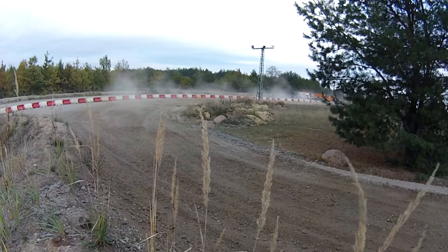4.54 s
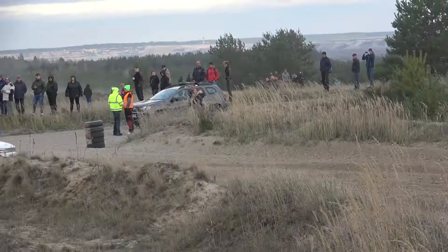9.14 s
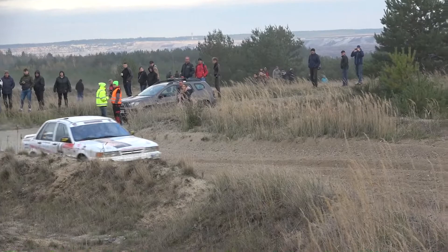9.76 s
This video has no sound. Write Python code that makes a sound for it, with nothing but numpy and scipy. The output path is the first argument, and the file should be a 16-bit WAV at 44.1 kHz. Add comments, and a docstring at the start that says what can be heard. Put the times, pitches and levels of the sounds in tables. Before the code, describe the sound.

A turbocharged rally car slides through a gravel bend, passes close with rasping exhaust and clicking stones, then pulls away.

```python
"""Rally car on a gravel bend

A turbocharged four-cylinder car slides through the bend, passes close by and pulls away. Its exhaust
pulses drone and rasp with the throttle, tyres tear at the gravel and stones click. Behind it are a
second, far engine and a faint high whine. Near the end the scene cuts to a car booming in the open."""
import sys
import numpy as np
from scipy import signal
from scipy.fft import rfft, irfft
from scipy.io import wavfile
from scipy.ndimage import uniform_filter1d

SR = 44100
rng = np.random.default_rng(int(sys.argv[2]) if len(sys.argv) > 2 else 0)


def pcm_store(signal):
    """Save signal as 16-bit PCM."""
    levels = np.round(np.clip(np.atleast_2d(signal), -1, 1) * 32767)
    wavfile.write(sys.argv[1], SR, levels.astype(np.int16).T)


N = 437472
T = np.arange(N) / SR


def amp(db):
    """Decibels to gain."""
    return 10 ** (np.asarray(db) / 20)


def unit(x):
    """Scale to rms 1."""
    return x / np.sqrt(np.mean(x ** 2) + 1e-20)


def curves(rows):
    """Table columns interpolated over the times in the first."""
    times_s, *columns = np.transpose(rows)
    return [np.interp(T, times_s, column) for column in columns]


def held(start_s, end_s, attack_s, release_s):
    """Envelope 0-1: rises from start_s, falls from end_s."""
    return np.clip(np.minimum((T - start_s) / attack_s, 1 - (T - end_s) / release_s), 0, 1)


def bell(centre_s, width_s):
    """Gaussian swell, 0-1."""
    return np.exp(-((T - centre_s) / width_s) ** 2)


def add(mix, start_s, sound):
    """Mix a sound in at start_s."""
    part = mix[round(start_s * SR):][:len(sound)]
    part += sound[:len(part)]


def colour(x, spectrum):
    """Filter by (Hz, dB) points, falling 30 dB per octave beyond the ends; rms 1."""
    hz, db = np.transpose(spectrum)
    bin_oct, point_oct = np.log2(np.fft.rfftfreq(N, 1 / SR) + 1), np.log2(hz)
    outside_oct = np.maximum(point_oct[0] - bin_oct, 0) + np.maximum(bin_oct - point_oct[-1], 0)
    return unit(irfft(rfft(x) * amp(np.interp(bin_oct, point_oct, db) - 30 * outside_oct), N))


def noise(spectrum):
    """Coloured noise, rms 1."""
    return colour(rng.standard_normal(N), spectrum)


def wander(rate_hz):
    """Smooth random curve up to about rate_hz, rms 1."""
    bin_hz = np.fft.rfftfreq(N, 1 / SR)
    return unit(irfft(rfft(rng.standard_normal(N)) / (1 + (bin_hz / rate_hz) ** 4), N))


def resonate(x, hz, width_hz, widen=1):
    """Two unity-gain resonators in series, the second widen times as wide."""
    for stage_hz in (width_hz, widen * width_hz):
        radius = np.exp(-np.pi * stage_hz / SR)
        x = 2 * signal.lfilter([1 - radius], [1, -radius * np.exp(2j * np.pi * hz / SR)], x).real
    return x


def patchy(x, depth_db, bins=9, frames=16):
    """Patches of the spectrum swell and fade, as on uneven ground; rms 1."""
    spectra = signal.stft(x, nperseg=1024, noverlap=768)[2]
    field = uniform_filter1d(uniform_filter1d(rng.standard_normal(spectra.shape), bins, 0), frames, 1)
    return unit(signal.istft(spectra * amp(depth_db * unit(field)), nperseg=1024, noverlap=768)[1][:N])


def whine(hz=10519, level_db=-67.5):
    """A faint, steady high tone."""
    return np.sqrt(2) * amp(level_db) * np.sin(2 * np.pi * hz * T)


def far_car(overtone_db=-19):
    """A second engine: distance leaves little but the firing tone."""
    # Each row: time in seconds, firing rate in Hz, level in dB.
    revs = [(7.7, 150, -50), (8.0, 155, -32.5), (8.36, 165.3, -30), (8.55, 156, -37.5), (9.2, 155, -35)]
    hz, db = curves(revs)
    phase = 2 * np.pi * np.cumsum(hz * (1 + 0.00687 * wander(12))) / SR
    tone = np.sin(phase) + amp(overtone_db) * (np.sin(2 * phase) + np.sin(3 * phase))
    return np.sqrt(2) * amp(db + 2.7 * wander(3.2)) * tone


def booming_car(boom_hz=141.7, sag_hz_per_s=11, edge_s=0.039, burble=0.18, pan_db=2):
    """Two pulls of burbling exhaust, leaning left, with a falling hum, tyre roar and wide hiss."""
    # Each row: start and end in seconds, then relative dB of firing tone, octave, roar and hiss.
    pulls = [(9.2, 9.607, -14.5, -42.5, -35.5, -51), (9.66, 9.93, -20, -30.5, -35.5, -46)]
    # Spectra. Each row: frequency in Hz, relative density in dB.
    rumble_spectrum = [(15, -28), (45, -15), (80, -3.5), (150, -1.5), (200, -6), (260, -13), (450, -22),
                       (800, -34.5)]
    roar_spectrum = [(260, -31), (450, -6.5), (604, -7), (713, -1), (1320, -8.5), (1490, -14),
                     (1990, -15.5), (2520, -37), (3000, -20.5), (3900, -64), (6600, -120)]
    hiss_spectrum = [(1470, -51), (2500, -2.5), (2880, -12), (3110, -4.5), (3950, -1.5), (4690, -10),
                     (5170, -9), (7410, -11), (15000, -33)]
    start_s, _, tone_db, octave_db, roar_db, hiss_db = curves([(s, *p) for p in pulls for s in p[:2]])
    pulling = np.max([held(begin_s, end_s, edge_s, edge_s) for begin_s, end_s, *_ in pulls], 0)
    phase = 2 * np.pi * np.cumsum(boom_hz - sag_hz_per_s * (T - start_s)) / SR
    odd_orders = np.sin(phase) + amp(-30) * (np.sin(3 * phase) + np.sin(5 * phase))
    tones = pulling * amp(tone_db) * odd_orders + amp(octave_db) * np.sin(2 * phase)
    boom = np.sqrt(2) * tones * (1 + burble * wander(45))
    hum_hz = np.interp(T, [9.2, 9.9], [416, 392])
    hum = amp(-35) * np.sin(2 * np.pi * np.cumsum(hum_hz) / SR)
    rumble = amp(-26 + 6 * bell(centre_s=9.5, width_s=0.06)) * noise(rumble_spectrum)
    side = np.array([[1], [-1]])  # left, right
    roar = patchy(noise(roar_spectrum), depth_db=1.4) + 0.086 * side * noise(roar_spectrum)
    hiss = noise(hiss_spectrum) + 0.35 * side * noise(hiss_spectrum)
    return (boom + hum + rumble) * amp(pan_db * side) + amp(roar_db) * roar + amp(hiss_db - 2) * hiss


def turbo(base_db=-68, db_per_hz=-0.03, fade_s=0.07, waver=0.0037, flicker_db=4):
    """The compressor's thin, unsteady whistle, fainter as its pitch rises."""
    # Each row: time in seconds, pitch in Hz.
    pitch = [(1.6, 8200), (2.15, 8050), (2.41, 8900), (2.72, 7750)]
    hz, = curves(pitch)
    start_s, start_hz = pitch[0]
    spinning = held(start_s, pitch[-1][0] - fade_s, fade_s, fade_s)
    level_db = base_db + db_per_hz * (hz - start_hz) + flicker_db * wander(22)
    phase = 2 * np.pi * np.cumsum(hz * (1 + waver * wander(80))) / SR
    return spinning * amp(level_db) * np.sin(phase)


def tyre_levels(nearness, load, coasting_db=-11):
    """Roar, grit and rumble in relative dB: rolling, which falls with distance, plus slides."""
    # Tyres break loose. Each row: start and end in seconds, then relative dB of roar, grit and rumble.
    slides = [(0.246, 1.018, -42.5, -64, -41), (0.88, 2.25, -40.5, -69, -37), (2.118, 3.705, -32, -57, -33),
              (2.786, 3.377, -31.5, -48, -27), (3.223, 3.673, -40, -45, -50),
              (4.36, 5.588, -34, -48.5, -31), (4.677, 5.09, -39, -46, -32), (5.05, 5.986, -70, -57.5, -34),
              (7.496, 8.92, -46.5, -68, -38)]
    roar = amp(-39.5) * nearness ** 0.99
    spray = amp(-50.5 + coasting_db * (1 - load)) * nearness ** 1.4  # undriven wheels throw less
    rumble = amp(-38.5) * nearness ** 0.9
    power = np.array([roar, spray, rumble]) ** 2
    for start_s, end_s, *levels_db in slides:
        power += np.outer(amp(levels_db), held(start_s, end_s, attack_s=0.29, release_s=0.11)) ** 2
    return 10 * np.log10(power)


def ground_rumble(level_db):
    """Low noise of tyres on the ground."""
    # Each row: frequency in Hz, relative density in dB.
    spectrum = [(15, -26), (35, -13), (70, -4), (110, -1.5), (200, -0.5), (330, -6.5), (480, -15),
                (900, -27)]
    return amp(level_db) * noise(spectrum)


def gravel_roar(level_db, cycles, pulsing, turn_start_s=3.32, turn_s=0.67):
    """Churned gravel and pulsing exhaust gas, changing colour as the car goes by."""
    # Spectra. Each row: frequency in Hz, relative density in dB.
    coming = [(300, -6), (450, -1.5), (650, -0.5), (850, 2), (1290, -2), (1600, -6), (2200, -8.5),
              (3500, -12.5), (4600, -28), (6000, -25.5)]
    going = [(300, -9), (500, -2), (700, 0), (980, -2.5), (1300, -1.5), (2000, -5), (2600, -9.5),
             (3000, -11.5), (4100, -24), (6000, -25)]
    passed = np.clip((T - turn_start_s) / turn_s, 0, 1)
    rush = patchy(np.sqrt(1 - passed) * noise(coming) + np.sqrt(passed) * noise(going), depth_db=1.33)
    throb = np.sqrt(1 - pulsing + pulsing * gas_puffs(cycles, decay_cycles=0.92) ** 2)
    return amp(level_db + wander(32)) * rush * throb


def grainy_swells(grain=0.41):
    """Grainy swells of band noise: gravel crunches and the tail of the exhaust rasp."""
    # Each row: midpoint in seconds, length in seconds, centre in Hz, width in Hz, level in dB.
    swells = [(1.483, 0.048, 2240, 1500, -36.5), (1.57, 0.07, 2040, 1500, -37),
              (3.441, 0.045, 1780, 2500, -28.5), (3.793, .2, 1050, 447, -35),
              (4.573, 0.25, 1860, 899, -35.5), (4.827, .16, 1430, 600, -36), (4.884, 0.11, 5310, 1200, -38),
              (6.653, 0.05, 4500, 3000, -40.5), (6.984, .022, 1520, 1400, -33),
              (7.187, 1.6, 5050, 1850, -51), (7.324, 0.87, 1610, 990, -43), (8.203, 1.0, 634, 379, -42.5),
              (8.323, 0.39, 3904, 1200, -50)]
    out = np.zeros(N)
    grainy = rng.standard_normal(N) * np.exp(grain * wander(200))
    for mid_s, length_s, hz, width_hz, db in swells:
        swell = np.hanning(round(length_s * SR))
        part = grainy[round(mid_s * SR):][:len(swell)]
        add(out, mid_s - length_s / 2, amp(db) * swell * unit(resonate(part, hz, width_hz)))
    return out


def crackle(hits_per_s=1500, spread_db=3, ring_s=0.0015, pitches=24):
    """Countless small stones, each a brief noisy ring; a few are large."""
    t, out = np.arange(512) / SR, np.zeros(N)
    for hz in np.linspace(3000, 14500, pitches):
        size = amp(spread_db * np.minimum(rng.exponential(1, N), 5))
        hits = size * rng.choice([-1, 1], N) * (rng.random(N) < hits_per_s / pitches / SR)
        ring = np.exp(-t / ring_s) * (np.sin(2 * np.pi * hz * t) + 0.72 * rng.standard_normal(len(t)))
        out += signal.oaconvolve(hits, ring)[:N]
    return unit(out)


def grit(level_db, gain_db=2, dust=0.93, clump_db=2):
    """Spray of grit and dust; the nearer and louder, the more treble it keeps."""
    # Spectra. Each row: frequency in Hz, relative gain in dB.
    far_spectrum = [(2500, 0.5), (4000, 0), (5000, -2.5), (6500, -5.5), (7600, -11.5), (10000, -9.5),
                    (12500, -16), (15500, -23)]
    near_spectrum = [(2500, -4), (4000, -3), (5300, -3), (6500, -6.5), (7800, -13), (10500, -9),
                     (13000, -12), (15500, -25)]
    spray = (crackle() + dust * rng.standard_normal(N)) * amp(clump_db * wander(16))
    near = np.clip((level_db + 54) / 9, 0, 1)
    blend = near * colour(spray, near_spectrum) + (1 - near) * colour(spray, far_spectrum)
    return amp(level_db + gain_db) * blend


def stones(crack_s=0.002, ring_s=0.0073, scatter_s=0.073):
    """Stones strike car and ground: a hard crack, two ringing modes, a scatter of chips."""
    # Each row: start in seconds, relative level in dB, pitch of the stone's main ring in Hz.
    strikes = [(0.713, -29, 3180), (0.7513, -33, 3820), (0.82, -34, 3420), (1.124, -35, 2980),
               (1.1749, -35, 3120), (2.6275, -24, 3090), (2.8943, -25, 3530), (2.9708, -17.5, 3220),
               (3.048, -16, 3400), (3.124, -24.5, 3100), (3.3162, -19.5, 3360), (3.362, -19.5, 3540),
               (3.5205, -22, 3218), (4.8597, -19, 5300), (4.947, -22, 5250), (5.0491, -18.5, 3816),
               (5.073, -20.5, 5350), (5.2745, -29, 5130), (5.709, -26.5, 5590), (6.1142, -36, 3268),
               (6.412, -31, 9960), (6.4627, -33.5, 6190), (6.6445, -22.5, 3467), (6.7727, -29, 4600)]
    t, out = np.arange(4000) / SR, np.zeros(N)
    band = signal.butter(2, [1900, 7000], "band", fs=SR)
    envelope = np.exp(-t / crack_s) + 0.074 * np.exp(-t / scatter_s)
    for start_s, db, hz in strikes:
        crack = signal.lfilter(*band, rng.standard_normal(len(t))) * envelope
        modes = np.sin(2 * np.pi * hz * t) + 0.5 * np.sin(2 * np.pi * rng.uniform(4500, 7000) * t)
        add(out, start_s, amp(db - 1) * (crack + 0.32 * modes * np.exp(-t / ring_s)))
    return out


def gas_puffs(cycles, decay_cycles):
    """Envelope of the decaying puff of gas from each firing; rms 1."""
    return unit(np.exp(-((cycles + 0.05) % 1) / decay_cycles))


def pops(rise_s=0.011, fall_s=0.045):
    """Unburnt fuel goes off in the pipe: short, dull bursts."""
    # Each row: start in seconds, level in dB.
    bursts = [(.75, -43), (3.37, -20), (3.43, -24.5)]
    gas = unit(resonate(rng.standard_normal(N), hz=260, width_hz=550))
    return gas * sum(amp(db) * held(s, s + rise_s, rise_s, fall_s) for s, db in bursts)


def bark(cycles, level_db=-36.5):
    """Gas puffs in the pipe's lowest resonance, heard from straight behind."""
    gas = gas_puffs(cycles, decay_cycles=0.38) * rng.standard_normal(N)
    return amp(level_db) * unit(resonate(gas, hz=560.2, width_hz=360))


def rasp(cycles, level_db=-29):
    """Sharp, turbulent puffs ring the tailpipe as the throttle is floored close by."""
    # Each row: resonance in Hz, width in Hz, relative gain in dB.
    modes = [(944, 140, 3.5), (1220, 170, 6), (1520, 120, 2.5), (2050, 210, -2), (2310, 330, 0.5),
             (3160, 180, -3), (4030, 160, -13)]
    gas = gas_puffs(cycles, decay_cycles=0.27) * rng.standard_normal(N)
    pipe = unit(sum(amp(db) * resonate(gas, hz, width_hz, widen=4) for hz, width_hz, db in modes))
    return amp(level_db) * held(start_s=3.51, end_s=3.72, attack_s=0.059, release_s=0.033) * pipe


def drone(cycles, tone_db, octave_db, corner_hz, uneven, fall_db_per_oct=17, flutter_hz=45):
    """Exhaust pulses as aligned engine orders; uneven firing shakes their size and timing."""
    # Each row: multiple of the firing rate, relative level in dB.
    orders = [(.5, -31), (1, 2), (1.5, -22), (2, -1), (2.5, -18), (3, -10), (3.5, -21.5), (4, -19),
              (4.5, -25), (5, -19.5), (5.5, -42), (6, -31), (6.5, -28), (7, -26)]
    order_db = dict(orders)
    hz = np.gradient(cycles) * SR
    shaken = cycles + 0.07 * uneven * wander(flutter_hz)
    out = np.zeros(N)
    for order, db in orders:
        size = amp(tone_db + db if order < 2 else octave_db + db - order_db[2])
        if order > 2:
            size *= amp(-fall_db_per_oct * np.maximum(np.log2(order * hz / corner_hz), 0))
        if order % 1:  # half orders come from unequal cylinders
            size *= uneven / 0.11 * amp(2 * wander(13))
        drift_rad = 0.45 * max(order - 2.5, 0) * wander(14)  # echo off the ground shifts the high orders as the car moves
        out -= size * np.sin(2 * np.pi * order * shaken + drift_rad)
    return np.sqrt(2) * out * (1 + 0.45 * uneven * wander(flutter_hz))


def exhaust(cycles, hz, tone_db, flare_db, load, nearness, loaded_db=0.25, coasting_db=-22.5):
    """Load and pipe aim brighten the drone; coasting and high-rev strain make it waver."""
    aim = bell(centre_s=4.6, width_s=0.43)  # the tailpipe points at the listener
    strain = np.clip((hz - 137.7) / 29, 0, 1)
    uneven = 0.13 + 0.15 * (1 - load) + 0.27 * strain
    octave_db = tone_db + load * loaded_db + (1 - load) * coasting_db
    corner_hz = 231 + 198 * load * nearness ** 2 + 480 * aim - 60.6 * strain
    waver_db = 7 * uneven * wander(7)
    tones = drone(cycles, tone_db + flare_db + waver_db, octave_db, corner_hz, uneven)
    return tones + aim * bark(cycles) + rasp(cycles) + pops()


def driving(rise_s=0.118, fall_s=0.087, press_s=0.068, lift_s=0.087, load_per_hz=0.016):
    """Firing rate, tone level, its change in rev flares, and engine load 0-1."""
    # Wheels gripping. Each row: time in seconds, firing rate in Hz, relative tone level in dB.
    revs = [(0, 124.1, -29.8), (0.52, 117.0, -30.1), (0.86, 104.0, -29.5), (1.06, 114.3, -26.5),
            (2.22, 125.9, -29.5), (2.62, 123.4, -27.5), (2.84, 132.5, -17.5), (3.37, 132.4, -18.5),
            (3.52, 109.9, -18.6), (3.62, 123.7, -19.5), (3.85, 115.7, -22.5), (4.1, 122.5, -19.5),
            (4.8, 143.7, -22), (4.9, 155.6, -25), (5.57, 165.7, -23.5), (5.73, 137.5, -24.5),
            (6.01, 124.4, -25.5), (6.28, 102.8, -23.5), (7.41, 117.9, -27.5), (9.01, 132.5, -35),
            (9.04, 118.0, -31.6)]
    # Wheel slips and throttle blips. Each row: peak time in seconds, rise in Hz, tone change in dB.
    flares = [(0.971, 12.94, -5.5), (1.251, 8.7, -4.6), (1.55, 4.57, -7.5), (2.36, 13.25, -5.6),
              (3.38, 5.43, 1), (3.748, 11.5, 3.5), (3.988, 9.75, 0.4), (6.138, 18.5, 1.5), (7.4, 8.3, -0.5)]
    # Each row: pedal down in seconds, pedal lifted in seconds, load 0-1.
    presses = [(0.76, 2.1, .47), (2.06, 3.38, 0.74), (3.479, 5.62, 0.88), (5.694, 6.1, 0.43),
               (6.031, 8.97, 0.8)]
    hz, tone_db = curves(revs)
    flare_hz, flare_db = sum(np.outer([rise_hz, db], held(peak_s - rise_s, peak_s, rise_s, fall_s))
                             for peak_s, rise_hz, db in flares)
    throttle = np.max([load * held(down_s, up_s, press_s, lift_s) for down_s, up_s, load in presses], 0)
    return hz + flare_hz, tone_db, flare_db, np.clip(throttle + load_per_hz * flare_hz, 0, 1)


def passing_car(nearest_s=3.73, nearest_m=14, speed_m_per_s=5.27):
    """Engine and gravel of the car in the bend."""
    hz, tone_db, flare_db, load = driving()
    cycles = np.cumsum(hz) / SR
    nearness = nearest_m / np.hypot(nearest_m, speed_m_per_s * (T - nearest_s))
    roar_db, grit_db, rumble_db = tyre_levels(nearness, load)
    engine = exhaust(cycles, hz, tone_db, flare_db, load, nearness) + turbo()
    rumble = ground_rumble(rumble_db)
    roar = gravel_roar(roar_db, cycles, pulsing=0.37 * (load * nearness) ** 2)
    return engine + rumble + roar + grainy_swells() + grit(grit_db) + stones()


def scene(cut_s=9.215):
    """The bend in mono, then a hard cut to the second spot in stereo."""
    before = np.clip((cut_s - T) / 0.0045, 0, 1)
    after = np.clip((T - cut_s) / 0.0043, 0, 1)
    return before * (passing_car() + far_car() + whine()) + after * booming_car()


def record(dry, cutoff_hz=15300):
    """Steep low-pass."""
    taps = signal.firwin(511, cutoff_hz, window=("kaiser", 9), fs=SR)
    return signal.oaconvolve(dry, taps[None], "same")


dry = scene()
out = record(dry)
pcm_store(out)
```